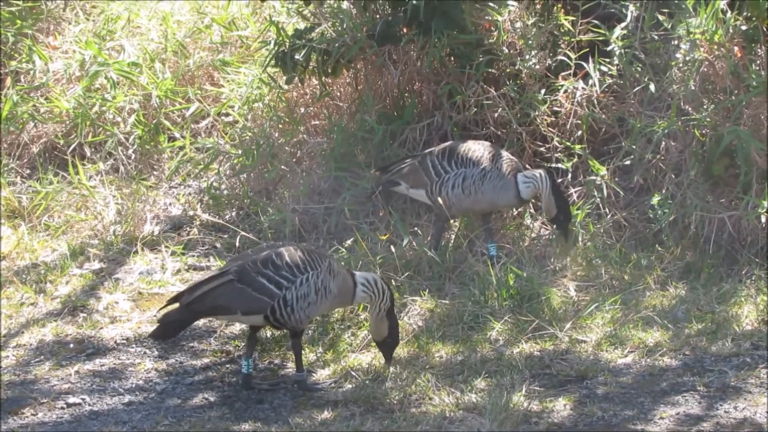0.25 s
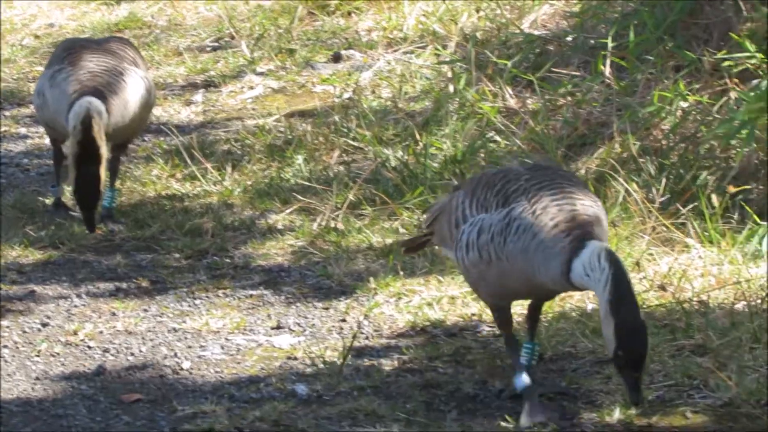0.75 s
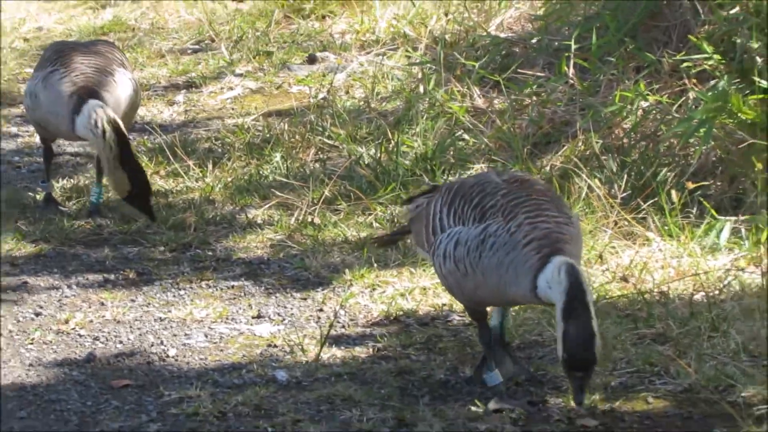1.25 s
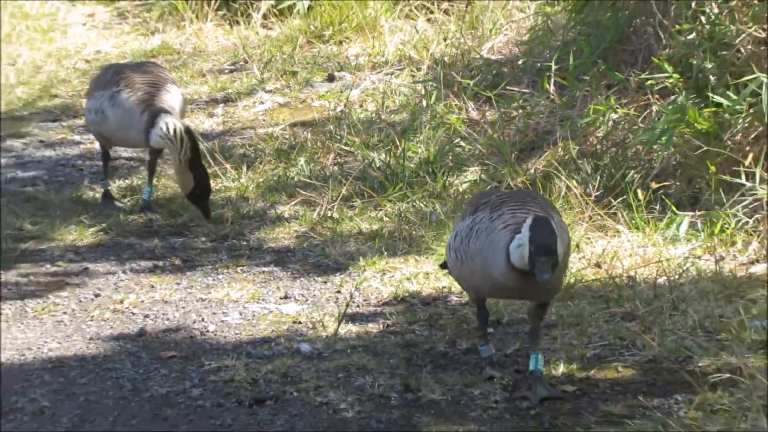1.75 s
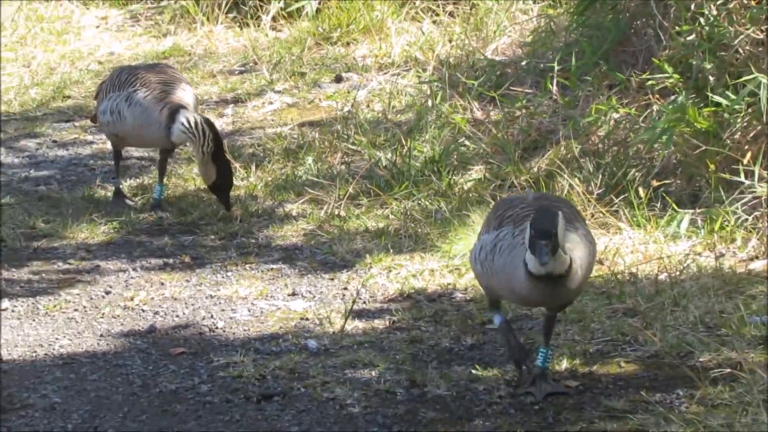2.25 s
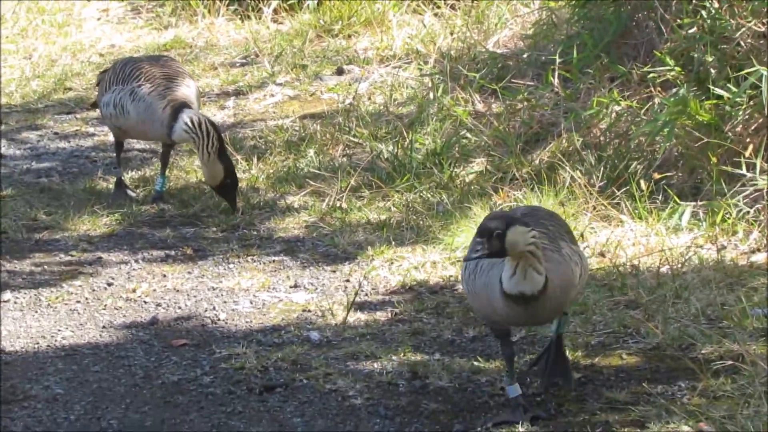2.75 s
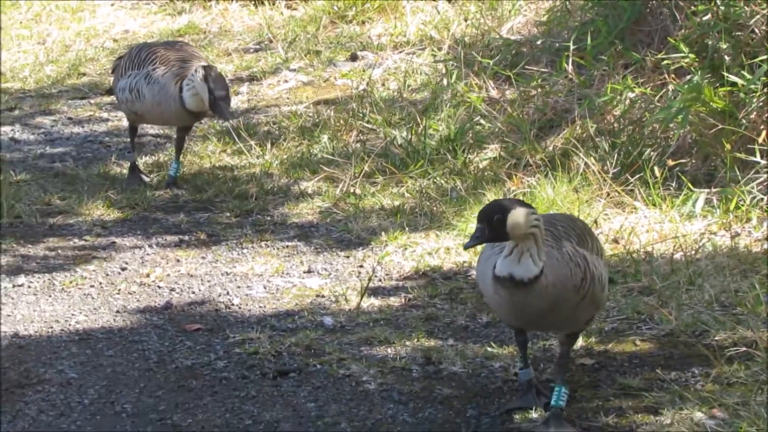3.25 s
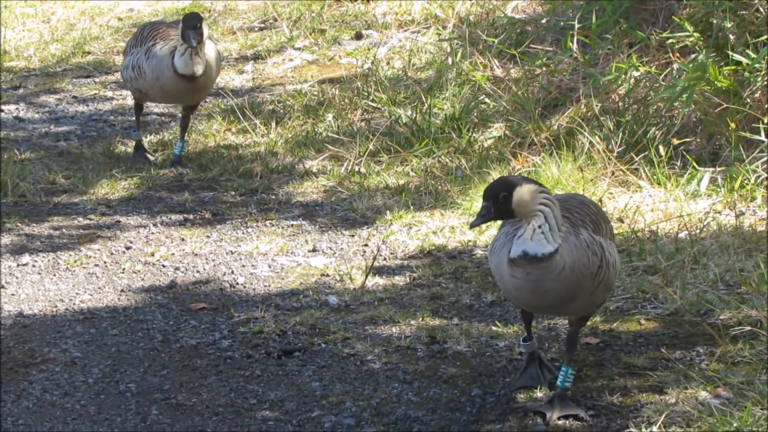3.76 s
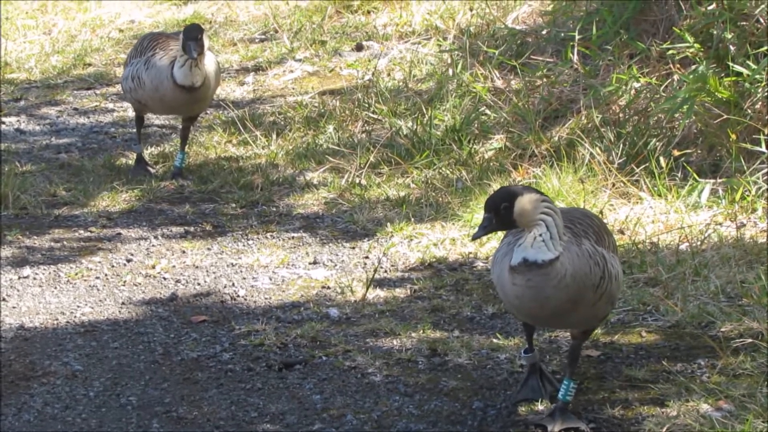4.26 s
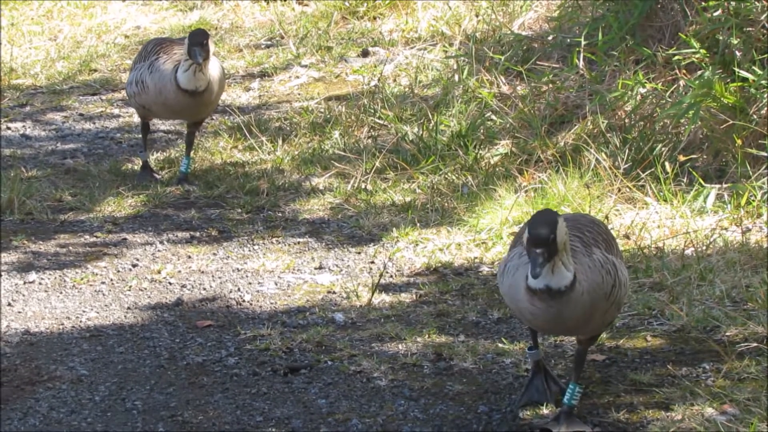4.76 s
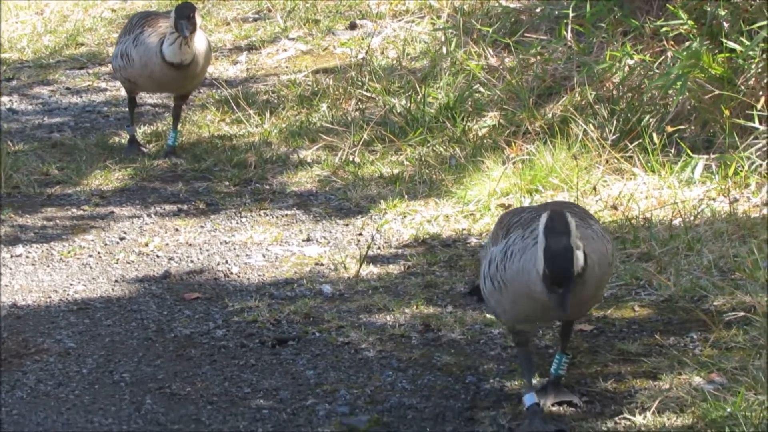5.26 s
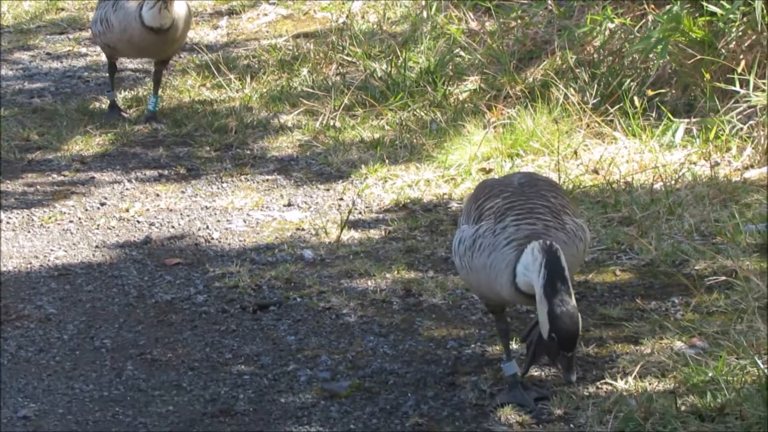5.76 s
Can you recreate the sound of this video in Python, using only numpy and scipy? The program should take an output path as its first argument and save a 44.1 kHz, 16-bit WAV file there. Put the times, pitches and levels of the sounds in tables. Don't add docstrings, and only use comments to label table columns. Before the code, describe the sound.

Stereo handheld camera outdoors, low distant rumble and soft hiss. A grass blade snaps at 0.06 s; near 0.17 s come bright snaps, a faint motor start and a tiny click. Total silence from 0.21 to 0.46 s, then the ambience returns lower and creeps up. A faint thud at 0.51, dry stalk cracks at 0.61, soft rustles from 0.7 to 1.1. At 1.17 a loud plastic clack starts a gritty motor whirr, rising slightly; at 1.77 a far louder, sharp double clack, then weaker whirring until a small knock at 1.89. From 2.0 to 2.9 grass rustles, snaps and beak ticks mix with light finger taps, tiny goose squeaks at 2.65 and thin falling distant chirps. Snaps at 3.19, one chirp at 3.4, then near-quiet. Low handling thuds around 4.5-4.6, ticks and a snap, a clear falling whistle at 4.87, isolated ticks at 5.15 and 5.64.

```python
import sys
import numpy as np
from scipy import signal
from scipy.fft import rfft, irfft
from scipy.io import wavfile
from scipy.ndimage import uniform_filter1d

SR = 44100
rng = np.random.default_rng(int(sys.argv[2]) if len(sys.argv) > 2 else 0)


def materialize(psi):
    bounded = np.clip(np.atleast_2d(psi).T, -1, 1)
    quanta = np.round(bounded * 32767).astype(np.int16)
    wavfile.write(sys.argv[1], SR, quanta)


def elevation(decibels):
    levels = np.asarray(decibels, float)
    return 10 ** (levels / 20)


N = 265658
TIME = np.arange(N) / SR
HZ = np.maximum(np.fft.rfftfreq(N, 1 / SR), 1)
CUT_START_S, CUT_END_S = 0.2128, 0.4593


def on_hz(table):
    hz, value = np.transpose(table)
    return np.interp(np.log(HZ), np.log(hz), value)


def unit(x):
    return x / np.sqrt(np.mean(x ** 2))


def stereo(mid, side):
    return np.array([mid + side, mid - side])


def pan(db):
    return elevation(np.array([[db / 2], [-db / 2]]))


def add(out, s, x):
    i = int(s * SR)
    out[:, i:i + x.shape[1]] += x


def decay(t, t60):
    return np.exp(-np.log(1000) * t / t60)


def band(x, hz, octaves):
    f = np.maximum(np.fft.rfftfreq(x.shape[-1], 1 / SR), 1)
    bell = np.exp(-2 * (np.log2(f / hz) / octaves) ** 2)
    return irfft(rfft(x) * bell, x.shape[-1])


def walk(rate):
    k = int(SR / rate)
    steps = np.repeat(rng.standard_normal(N // k + 1), k)
    smooth = uniform_filter1d(uniform_filter1d(steps, k), k)
    return unit(smooth[:N])


def fading(start, db, seconds):
    return db * np.exp(-np.maximum(TIME - start, 0) / seconds) * (TIME >= start)


def knocks(blows, modes):
    out = np.zeros((2, N))
    t = np.arange(int(0.09 * SR)) / SR
    hz, t60, left_db, right_db, sign = np.transpose(modes)[:, :, None]
    chances_db = rng.standard_normal((len(blows), len(modes), 1))
    for (s, db, contact_ms, lag_ms), chance_db in zip(blows, chances_db):
        reach = elevation(db + chance_db) * np.exp(-(hz * contact_ms / 1000) ** 2)

        def ring(u):
            onset = 1 - np.exp(-(u * 1000 / contact_ms) ** 2)
            return -np.sin(2 * np.pi * hz * u) * decay(u, t60) * onset

        left = reach * elevation(left_db) * ring(np.maximum(t - lag_ms / 1000, 0))
        right = reach * sign * elevation(right_db) * ring(t)
        add(out, s, np.array([left.sum(0), right.sum(0)]))
    return irfft(rfft(out) / (1 + (260 / HZ) ** 4), N)


def zoom_lever():
    # (time [s], strength [dB], contact [ms], left lags right [ms])
    press_blows = [
        (1.1705, -19.5, 0.19, 0.052),
        (1.1719, -17, 0.11, 0),
        (1.1734, -15.5, 0.14, 0),
        (1.1770, -18, 0.45, 0),
        (1.1800, -23, 0.53, 0),
    ]
    catch_blows = [
        (.1985, -43, 0.12, 0.1),
        (.2015, -39.5, 0.1, 0.07),
        (.2045, -47, 0.24, 0.085),
        (.208, -44.5, .3, 0.1),
        (1.7655, -12, 0.37, 0.63),
        (1.7690, -28, 0.18, 0.37),
        (1.7705, -13, 0.11, 0.33),
    ]
    release_blows = [
        (1.7716, -2, 0.28, 0.62),
        (1.7727, -2.5, 0.27, 0.44),
    ]
    # (frequency [Hz], t60 [s], left [dB], right [dB], right swings with +1 or against -1 [share])
    press_modes = [(490, 0.013, -12, -7.5, 1), (626, 0.077, -23.5, -38, 0.47), (1277, 0.082, -19, 5, -0.17),
                   (1720, 0.0088, 5.5, -1.5, -0.92), (2326, 0.016, -1, -3.5, 0.78),
                   (2950, 0.011, -6, -8, -1.2), (4980, .010, -15, -7, -1.17), (8750, 0.0057, -22, -16, 1)]
    catch_modes = [(1010, 0.008, -0.5, 4, 0.9), (1500, 0.0075, -14, -16, -0.8), (2430, 0.005, 1, -8, 0.68)]
    release_modes = [(790, 0.04, -18.5, -7, 0.39), (1016, 0.013, -3.5, 2, 0.63),
                     (1258, .024, -5.5, -5, 0.77), (1326, 0.078, -26, -26, 0.72),
                     (1850, 0.051, -19.5, -12.5, -0.58), (2080, 0.079, -35, -26, 0.85),
                     (3094, 0.024, -33, -3, 1), (4130, 0.017, -15, -3.5, 0.95)]
    pressed = knocks(press_blows, press_modes)
    caught = knocks(catch_blows, catch_modes)
    return pressed + caught + knocks(release_blows, release_modes)


def ticks(rows, t60_ms):
    out, t = np.zeros((2, N)), np.arange(1024) / SR
    likeness, lead = 0.55, 64
    for s, db, hz, pan_db, octaves in rows:
        noise = rng.standard_normal((3, 1024))
        burst = likeness * noise[0] + (1 - likeness) * noise[1:]
        burst = np.roll(burst * decay(t, t60_ms / 1000), lead, axis=1)
        burst = band(burst, hz, octaves)
        peak = np.abs(burst.mean(0)).max()
        add(out, s - lead / SR, burst / peak * elevation(db) * pan(pan_db))
    return out


def shell_cracks():
    # (time [s], peak [dB], centre [Hz], left minus right [dB], width [octaves])
    cracks = [
        (1.1652, -50, 5200, 0, .8),
        (1.172, -42, 6450, -0.5, 1.3),
        (1.7710, -19, 7800, 0, 0.6),
        (1.7717, -18, 7960, -8, 2.5),
        (1.7740, -25, 5010, -6.5, 1.6),
        (1.7775, -38, 5010, -6.5, 1.6),
        (1.885, -44, 5980, 0, 2.1),
    ]
    return ticks(cracks, t60_ms=3.5)


def motor_gain():
    # (on [s], lever released [s], off [s], level [dB])
    runs = [
        (0.162, .2128, .2128, -56),
        (1.171, 1.781, 1.886, -48),
    ]
    edge_s = 0.008
    gain = 0
    for on, released, off, db in runs:
        running = np.clip(np.minimum(TIME - on, off + edge_s - TIME) / edge_s, 0, 1)
        start_db = fading(on, 9, 0.06) - fading(on, 11, 0.17)
        coast_db = -3.5 * (TIME > released) - fading(released, 5, 0.03)
        gain = gain + running * elevation(db + start_db + coast_db)
    return gain


def motor():
    # (frequency [Hz], width [Hz], mid [dB], side [dB])
    housing = [(484, 450, -0.5, -1.5), (1350, 170, 0, 6), (1750, 810, -4.5, -0.5), (3400, 900, -8, -7.5),
               (5160, 610, -12.5, -5), (7150, 1500, -9.5, -25), (8200, 900, -8.5, -6.5),
               (9200, 820, -7.5, -6), (10600, 1300, -12, -8), (12830, 430, -9, -16.5),
               (15000, 900, -22, -21)]
    scatter_db, flicker_db = 2.5, 0.5
    teeth = rfft(rng.standard_normal((2, N)) * elevation(scatter_db * rng.exponential(size=N)))
    power = np.zeros((2, len(HZ)))
    for hz, width_hz, mid_db, side_db in housing:
        height = elevation(np.array([[mid_db], [side_db]]) * 2)
        power += height / (1 + (2 * (HZ - hz) / width_hz) ** 2)
    power[0] *= 1 - 0.7 / (1 + (2 * (HZ - 4600) / 500) ** 2)
    mid, side = irfft(teeth * np.sqrt(power) * HZ / (HZ + 150), N)
    return stereo(mid, side) / np.std(mid) * motor_gain() * elevation(flicker_db * walk(25))


def lens_stop():
    # (time [s], strength [dB], contact [ms], left lags right [ms])
    stop_blows = [
        (1.8843, -32, 0.16, 0.033),
        (1.8866, -32.5, 0.32, 0.005),
    ]
    # (frequency [Hz], t60 [s], left [dB], right [dB], right swings with +1 or against -1 [share])
    stop_modes = [(563, 0.036, 0, -1.5, 0.7), (786, 0.03, -7, -6.5, -0.3), (1320, 0.022, -1, -9.5, -0.74),
                  (1900, 0.015, 4, -11, 0.44), (2760, .012, -7, -7.5, .5)]
    return knocks(stop_blows, stop_modes)


def hand_grip():
    # (time [s], strength [dB], contact [ms], left lags right [ms])
    grip_blows = [
        (2.030, -42, 0.65, 0),
        (2.038, -40.5, 0.72, 0),
        (2.270, -41.5, 0.32, 0),
        (2.2812, -37, 0.11, 0),
        (2.299, -35.5, 0.41, 0),
        (2.665, -50, 0.6, 0),
        (2.71, -37.5, 0.84, 0),
    ]
    # (frequency [Hz], t60 [s], left [dB], right [dB], right swings with +1 or against -1 [share])
    grip_modes = [(433, 0.043, -0.5, 0.5, 0.82), (666, 0.025, -2, -6, 0.53), (840, 0.04, -14, -8, -0.43),
                  (1300, 0.025, -3, -5, -0.8), (1810, 0.02, 4, -9, 0.57), (3000, .015, -10, -12.5, -1)]
    return knocks(grip_blows, grip_modes)


def thuds():
    # (time [s], peak [dB], frequency [Hz], t60 [s], left minus right [dB])
    jolts = [
        (0.514, -55, 65, 0.13, 13),
        (4.501, -51, 90, 0.044, -12),
        (4.513, -49, 80, .06, -14),
        (4.56, -45, 78, .07, -20),
        (4.609, -47, 85, .05, -2),
    ]
    out, t = np.zeros((2, N)), np.arange(int(0.12 * SR)) / SR
    for s, db, hz, t60, pan_db in jolts:
        add(out, s, elevation(db) * pan(pan_db) * np.sin(2 * np.pi * hz * t) * decay(t, t60))
    return out


def snapped_blades():
    # (time [s], peak [dB], centre [Hz], left minus right [dB])
    snaps = [
        (0.0582, -40, 3290, 9.5),
        (.169, -41, 8950, 1.5),
        (.179, -45, 7000, -2.5),
        (2.1246, -41, 5600, 3),
        (2.130, -40, 4000, 0),
        (2.317, -45, 5500, 0),
        (2.9557, -47, 6000, 4),
        (3.1847, -42.5, 8000, 0),
        (3.188, -43, 8000, -1.5),
        (4.6668, -45, 4500, -2.5),
    ]
    return ticks([(*row, 1.7) for row in snaps], t60_ms=4.2)


def beak_pecks():
    # (time [s], peak [dB], centre [Hz], left minus right [dB])
    pecks = [(0.059, -45.5, 8900, 15), (.580, -53, 8000, 0), (.853, -51, 7950, -1),
             (1.084, -48.5, 1680, -12), (2.0028, -52, 5400, 1), (2.0206, -46, 6000, 4),
             (2.1026, -48, 7700, 0), (2.2823, -36.5, 4240, 1), (2.284, -48, 7500, 2), (2.336, -51, 7000, 0),
             (2.49, -47, 9000, 0), (3.2, -52, 8300, -2), (4.6267, -44, 3140, 12), (5.1502, -44, 6000, 4),
             (5.6418, -44.5, 4800, 3)]
    return ticks([(*row, 0.8) for row in pecks], t60_ms=4)


def dry_stalks():
    # (time [s], peak [dB], centre [Hz], left minus right [dB])
    stalks = [
        (.608, -43, 7020, 0),
        (0.6159, -38.5, 6340, 8),
        (.621, -39, 5460, 8),
    ]
    return ticks([(*row, 1.1) for row in stalks], t60_ms=1.3)


def rustles():
    # (start [s], length [s], rms [dB], centre [Hz], left minus right [dB])
    strokes = [(0.699, 0.095, -55, 900, 2), (0.926, 0.074, -57, 1500, -2), (1.07, 0.07, -61.5, 1500, -3),
               (1.89, 0.031, -54.5, 3000, 2), (2.002, 0.062, -50.5, 800, 1), (2.019, .08, -57.5, 5000, 4),
               (2.16, 0.053, -62, 1500, 7), (2.262, 0.062, -47.5, 1300, 7), (2.277, 0.066, -49, 4500, 4.5),
               (2.315, 0.066, -57, 3000, 2), (2.228, 0.057, -57.5, 6500, 4), (2.5, 0.14, -63, 6300, 3),
               (2.48, .18, -63, 4800, 3), (2.66, .18, -62, 4500, 3), (2.639, 0.096, -58, 2800, 6.5),
               (2.658, .06, -58, 750, -2), (2.729, 0.045, -58.5, 6600, 5), (2.78, .11, -64, 6700, 4)]
    scatter_db, size = 7.0, 8192
    out = np.zeros((2, N))
    for s, length, db, hz, pan_db in strokes:
        noise = rng.standard_normal((3, size))
        octaves = 2.0 * max(1 - (hz / 7370) ** 2, 0.12)
        grains = band(noise[:2] * elevation(scatter_db * noise[2]), hz, octaves)
        swell = np.sin(np.pi * np.minimum(np.arange(size) / (length * SR), 1)) ** 0.42
        add(out, s, unit(grains) * swell * elevation(db) * pan(pan_db))
    return out


def voice(notes, bend, overtone_db):
    out = np.zeros((2, N))
    wobble, pitch_rasp, overtone_rasp = walk(400), walk(350), walk(600)
    pitch_hoarse, overtone_hoarse = 0.3, 0.42
    for s, length, first_hz, last_hz, db in notes:
        u = np.arange(int(length * SR)) / (length * SR)
        i = int(s * SR) + np.arange(len(u))
        hz = (first_hz + (last_hz - first_hz) * u ** bend) * (1 + 0.009 * wobble[i])
        phase = 2 * np.pi * np.cumsum(hz) / SR
        first = np.sin(phase) * (1 - pitch_hoarse + pitch_hoarse * pitch_rasp[i])
        second = np.sin(2 * phase) * (1 - overtone_hoarse + overtone_hoarse * overtone_rasp[i])
        swell = np.sin(np.pi * u) ** 0.35
        add(out, s, elevation(db) * swell * (first + elevation(overtone_db) * second) * np.ones((2, 1)))
    echoes = unit(rng.standard_normal((2, 4096)) * decay(TIME[:4096], 0.1)) / 64
    return out + elevation(-4) * signal.fftconvolve(out, echoes, axes=1)[:, :N]


def goose_throat():
    # (start [s], length [s], first pitch [Hz], last pitch [Hz], level [dB])
    throat_notes = [
        (2.65, .035, 3900, 3800, -61),
        (2.68, .035, 2500, 2050, -62),
        (2.662, .022, 790, 800, -55),
        (2.692, .028, 800, 330, -53),
    ]
    return voice(throat_notes, bend=1.1, overtone_db=-14)


def bird():
    # (start [s], length [s], first pitch [Hz], last pitch [Hz], level [dB])
    chirps = [
        (.455, .07, 3250, 2550, -66.5),
        (2.028, .062, 3450, 2700, -61),
        (2.085, .075, 2620, 2540, -60),
        (2.235, .054, 3650, 2650, -56),
        (2.565, .06, 2700, 2800, -59),
        (2.712, .06, 4200, 2450, -57.5),
        (3.375, .085, 2900, 2480, -62),
    ]
    whistles = [
        (2.487, .072, 3050, 2650, -57.5),
        (2.853, .032, 3400, 2600, -59),
        (4.872, .062, 3080, 2400, -54),
    ]
    return voice(chirps, bend=0.6, overtone_db=1) + voice(whistles, bend=1.6, overtone_db=-3.5)


def air():
    # (frequency [Hz], level per Hz [dB])
    air_colour = [(12, -43), (20, -5.5), (116, -0.5), (277, -0.5), (319, -1), (422, -2), (738, -5.5),
                  (802, -3.5), (1290, -10.5), (1570, -12.5), (2080, -14), (12100, -26), (16000, -33.5)]
    # (frequency [Hz], side minus mid [dB])
    air_side = [(60, 2.5), (110, 7.5), (200, 4.5), (380, 4.5), (700, 2.5), (1290, 2), (2380, 0.5),
                (4400, -1), (8120, 0), (15000, -1.5)]
    # (frequency [Hz], left minus right [dB])
    air_balance = [(60, 3.5), (110, -3), (200, -0.5), (380, -1.5), (700, -2), (1290, -2.0), (2380, -1.5),
                   (4400, 0.5), (8120, 1.5), (15000, -1.5)]
    mid, side = rfft(rng.standard_normal((2, N))) * elevation(on_hz(air_colour))
    both = stereo(mid, side * elevation(on_hz(air_side)))
    both = both * elevation(np.outer([0.5, -0.5], on_hz(air_balance)))
    low_share = 1 / (1 + (HZ / 1900) ** 2)
    wake = fading(CUT_END_S, 4.5, 0.38)
    duck = fading(1.9, 2.5, 0.072)
    first = TIME < CUT_END_S
    rumble_db = np.where(first, -56.5, -56 + 0.5 * TIME - wake - duck / 2)
    hiss_db = np.where(first, -59, -60 - wake - duck)
    rumble = unit(irfft(both * np.sqrt(low_share), N)) * elevation(rumble_db + 0.8 * walk(5))
    hiss = unit(irfft(both * np.sqrt(1 - low_share), N)) * elevation(hiss_db + 0.5 * walk(9))
    return rumble + hiss


def scene():
    camera = zoom_lever() + shell_cracks() + motor() + lens_stop() + hand_grip() + thuds()
    geese = snapped_blades() + beak_pecks() + dry_stalks() + rustles() + goose_throat()
    return camera + geese + bird() + air()


def low_pass(x):
    return signal.sosfilt(signal.butter(12, 16660, fs=SR, output="sos"), x)


def record(dry):
    running = (TIME < CUT_START_S) | (TIME > CUT_END_S)
    narrow = irfft(rfft(dry) * (HZ < 15760), N)
    return low_pass(np.clip(narrow * running, -1, 1))


dry = scene()
out = record(dry)
materialize(out)
```